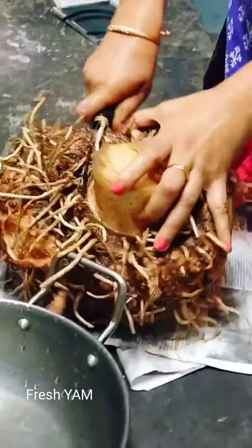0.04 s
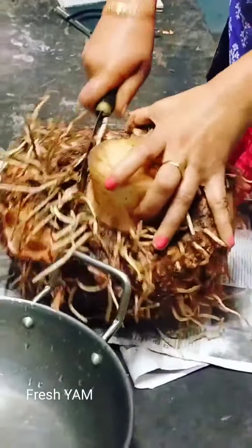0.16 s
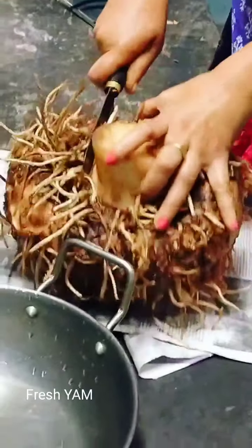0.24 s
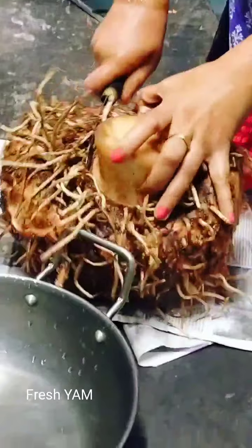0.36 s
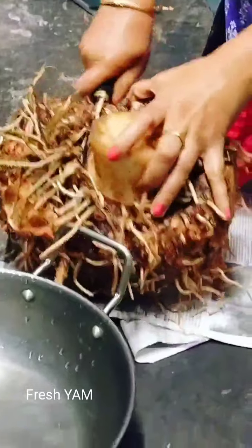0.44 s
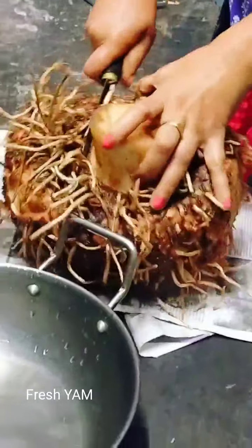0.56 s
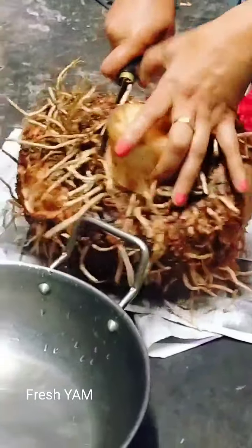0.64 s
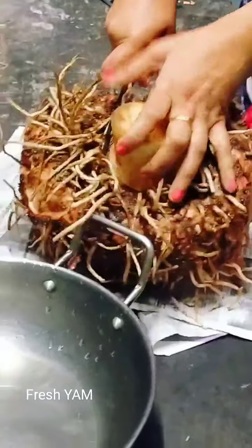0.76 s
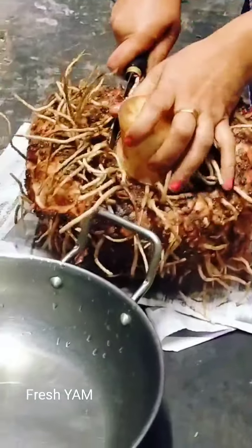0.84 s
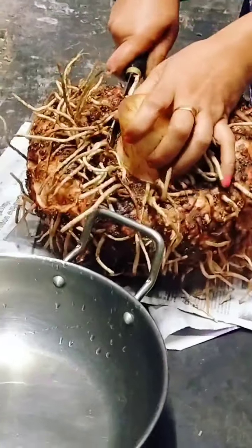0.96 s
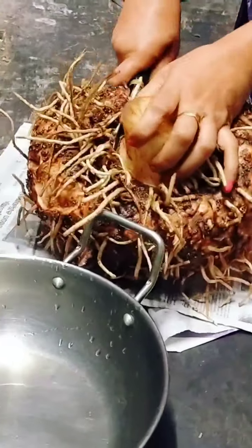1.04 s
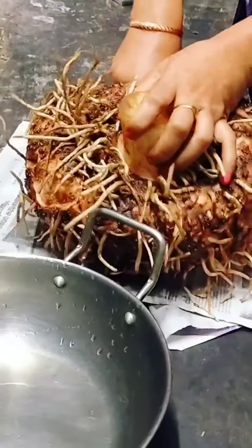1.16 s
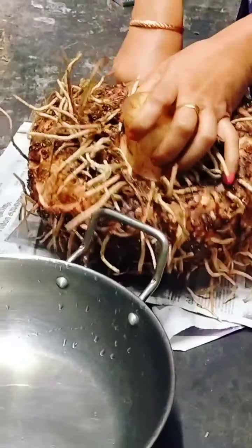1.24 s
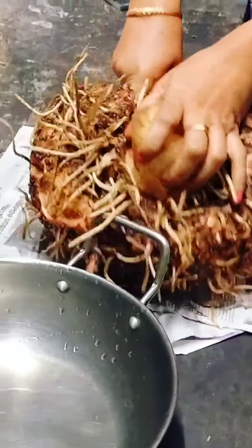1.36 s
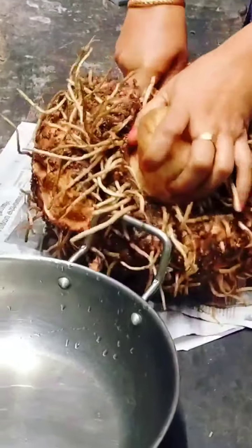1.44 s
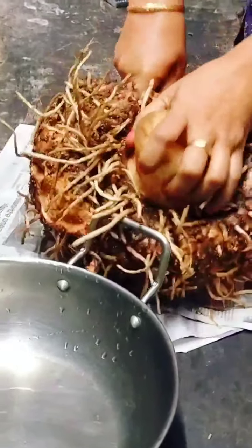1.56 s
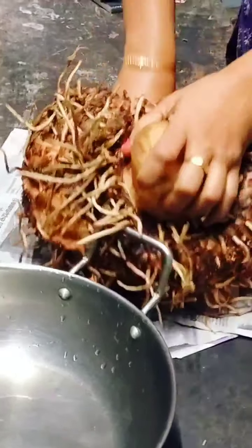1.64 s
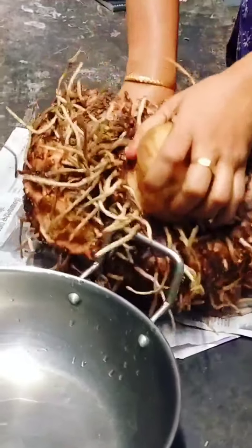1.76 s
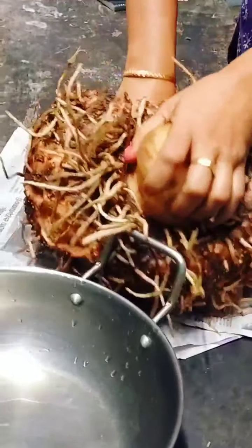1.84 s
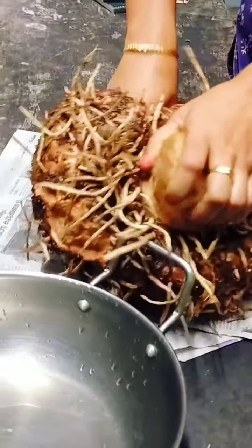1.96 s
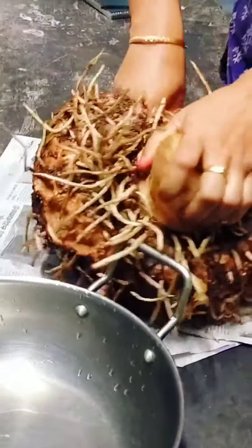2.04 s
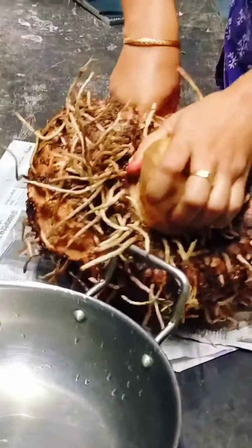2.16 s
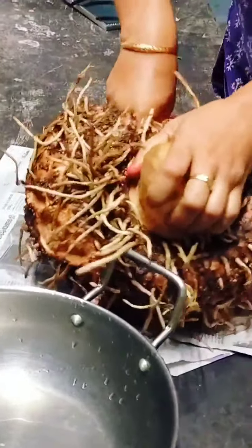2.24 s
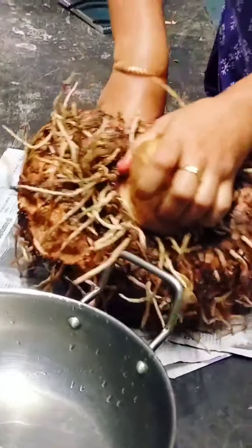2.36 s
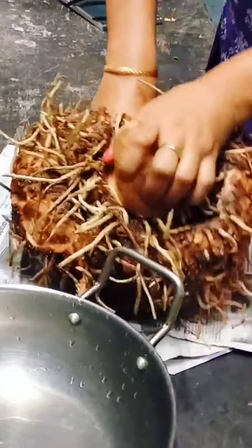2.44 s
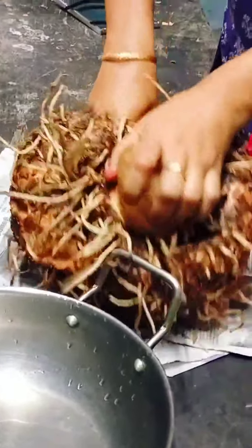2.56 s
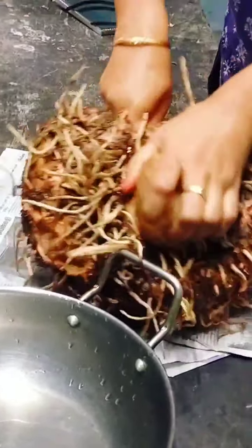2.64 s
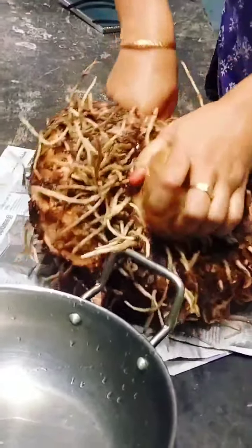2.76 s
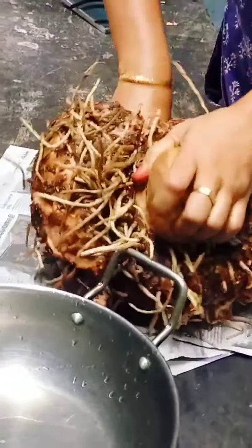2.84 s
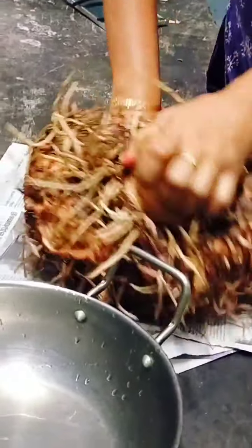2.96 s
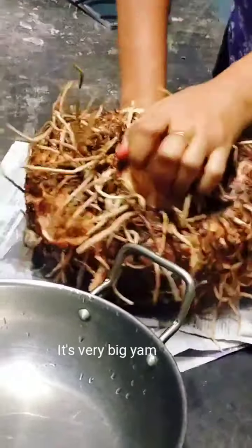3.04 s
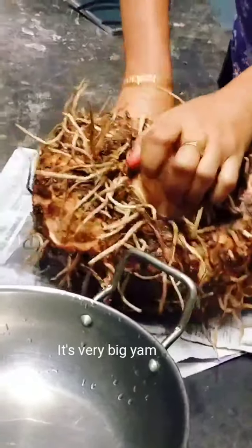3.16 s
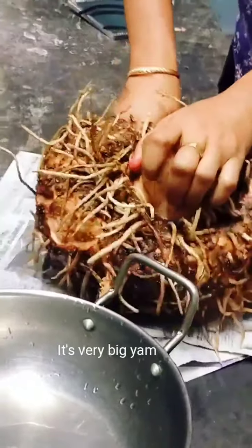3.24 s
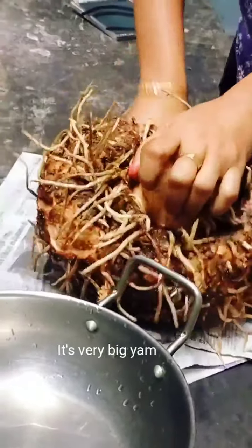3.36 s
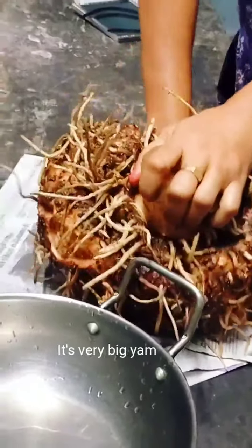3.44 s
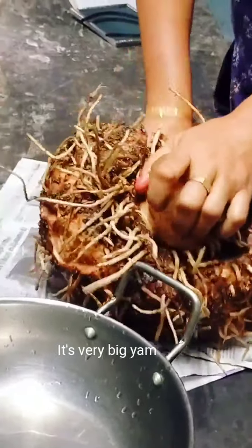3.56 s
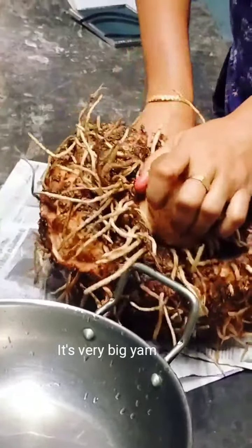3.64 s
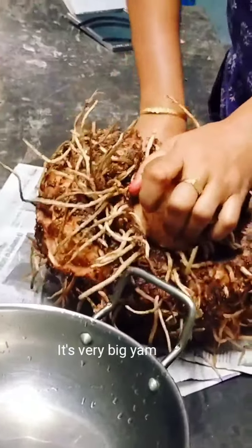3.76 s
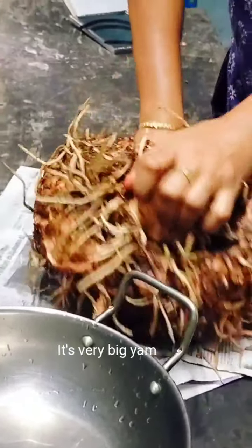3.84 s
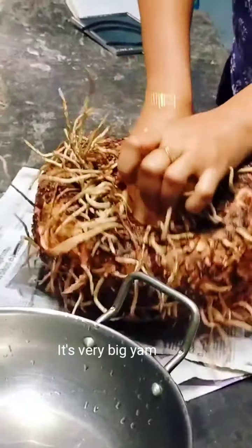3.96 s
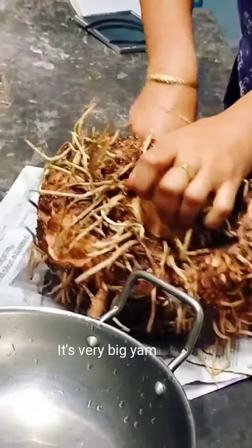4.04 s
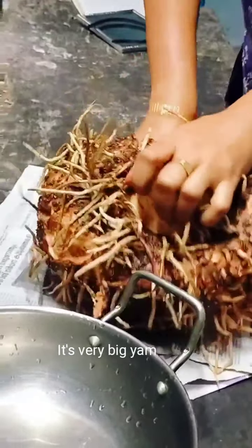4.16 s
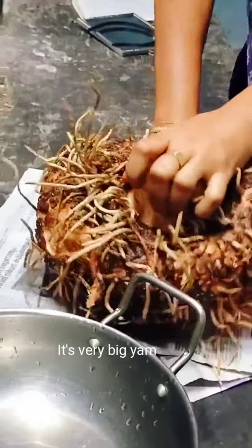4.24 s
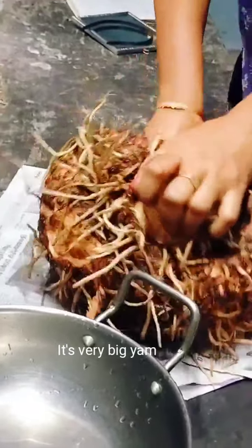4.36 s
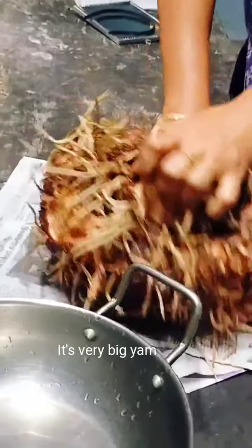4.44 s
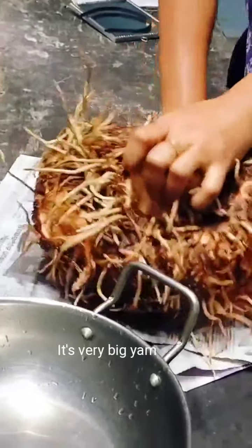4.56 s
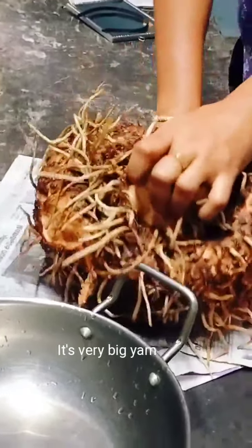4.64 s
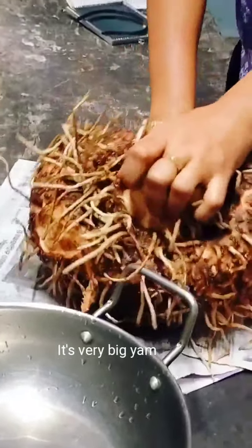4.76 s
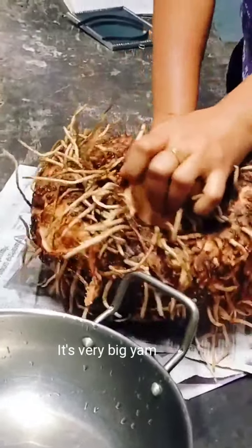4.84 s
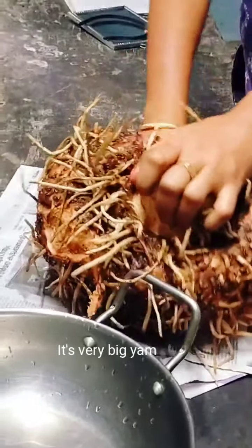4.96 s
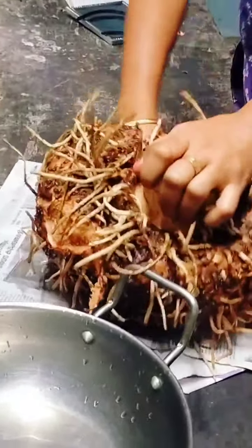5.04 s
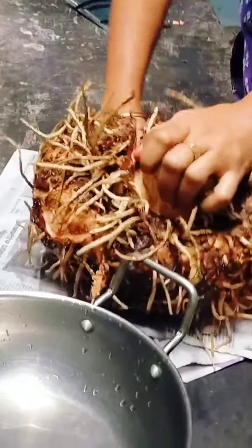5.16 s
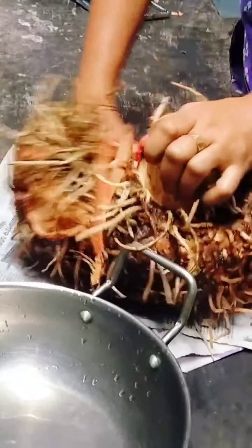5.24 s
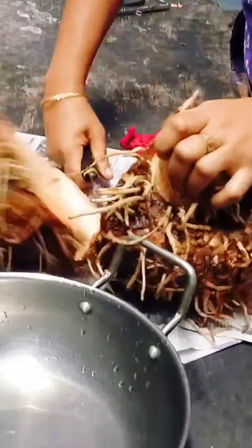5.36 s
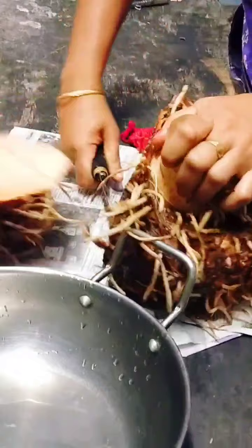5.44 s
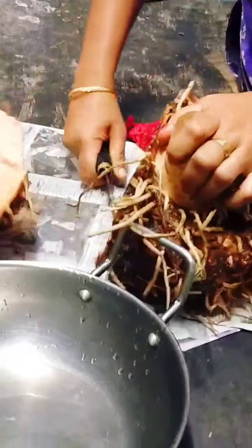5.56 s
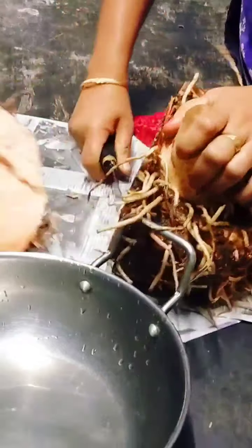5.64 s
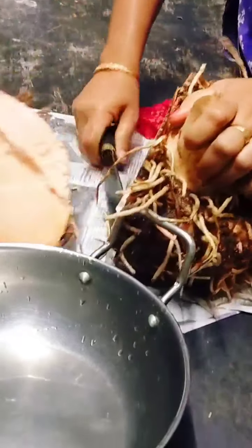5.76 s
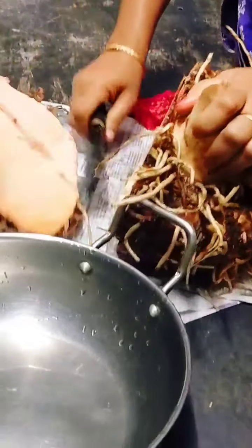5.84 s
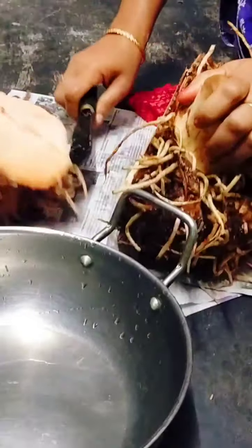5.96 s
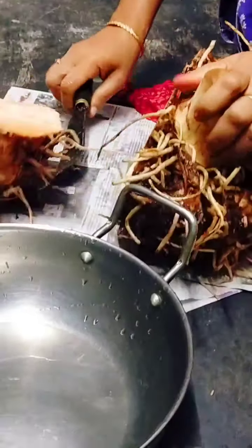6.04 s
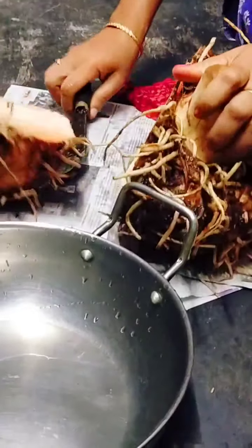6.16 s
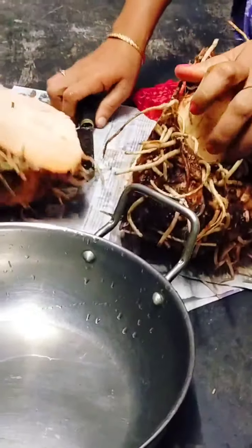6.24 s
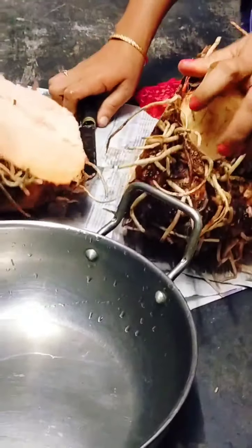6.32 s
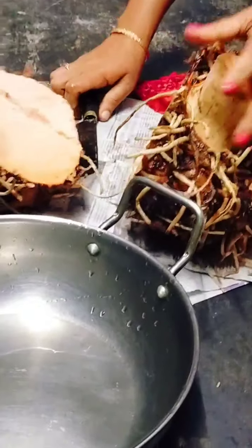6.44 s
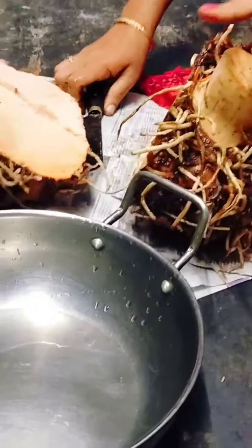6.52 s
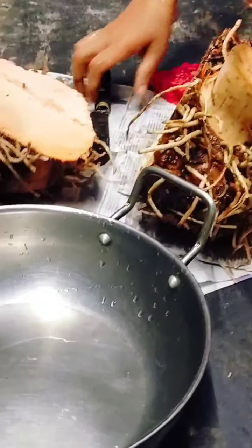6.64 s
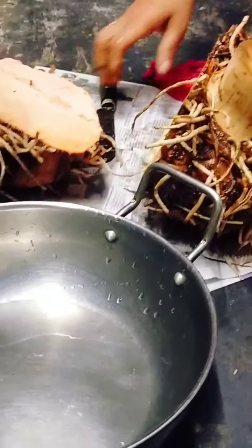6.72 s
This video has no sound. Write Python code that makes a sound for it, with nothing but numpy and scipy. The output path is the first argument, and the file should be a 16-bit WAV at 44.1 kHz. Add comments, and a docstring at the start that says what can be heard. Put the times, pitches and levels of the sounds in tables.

```python
"""Short knife strokes tear through a huge rooty yam: fibres rip and snap, and juice fizzes in the cut.
Clumped clicks and noise bursts ring broad resonances of yam and blade; the fizz is treble hiss, combed.
Knocks and thuds ring the modes of the table, which rumbles on; the yam splits, one half falls and rocks,
and the knife is laid down. A far bird (gliding sines), outdoor air and puffs of wind (noise) lie below."""
import sys
import numpy as np
from scipy import signal
from scipy.fft import rfft, irfft, next_fast_len
from scipy.io import wavfile

SR = 44100
rng = np.random.default_rng(int(sys.argv[2]) if len(sys.argv) > 2 else 0)


def dump(signal):
    """Clip the signal to [-1, 1] and save it as 16-bit WAV at the path in sys.argv[1]."""
    limited = np.clip(np.atleast_2d(signal).T, -1, 1)
    pcm = np.round(limited * 32767).astype(np.int16)
    wavfile.write(sys.argv[1], SR, pcm)


N = 299292  # length in samples

# Single fibres snapping. Each row: start in seconds, relative crunch level in dB,
# relative treble level in dB, brightest near this pitch in Hz.
SNAPS = [(0.2532, -42, -26, 10300), (0.4928, -33, -34, 6270), (1.1535, -36, -33, 7800),
         (1.1912, -34, -19, 9150), (1.6337, -41, -35, 7300), (1.6627, -29, -27, 5500),
         (1.6759, -25, -28, 9200), (1.684, -34, -31, 6500), (1.7068, -33, -33, 6000),
         (1.7767, -49, -40, 6000), (2.0724, -42, -28.5, 10700), (2.3614, -27, -29, 8100),
         (2.8843, -27, -34, 7900), (2.9, -37, -27.5, 4800), (3.0142, -35, -37, 6200),
         (3.207, -36, -32.5, 8950), (3.2288, -26, -32, 6400), (3.4658, -34, -28.5, 6300),
         (3.7303, -30, -35, 8800), (3.7654, -31, -32, 6900), (3.782, -36, -29, 7500),
         (3.9251, -26, -21.5, 6850), (3.9371, -24, -38, 6600), (3.9704, -16.5, -26, 5460),
         (4.2128, -22.5, -34.5, 8000), (4.243, -35, -40, 6400), (4.257, -28, -33, 6100),
         (4.541, -30, -38, 4800), (4.5761, -38, -31, 6100), (4.6002, -25, -26, 4650),
         (4.606, -14, -25, 4500), (4.6149, -21, -29, 4740), (5.1203, -25, -32, 7000),
         (5.2011, -20, -24, 5750), (5.2274, -18.5, -16.5, 5600), (5.247, -21, -21, 4800),
         (5.2675, -15.5, -10.5, 4560), (5.2786, -7, -28, 5200), (5.2933, -16, -27, 8600),
         (5.3093, -19, -25, 6000), (5.321, -18, -19, 8100), (5.3403, -17, -34, 8700),
         (5.4024, -16.5, -30, 8300), (5.476, -16.5, -26.5, 5400), (6.002, -45, -38, 6300),
         (6.011, -42.5, -38, 6040), (6.3436, -20, -27, 6900), (6.5571, -27, -38, 4800)]
# The weight of the yam jolting the table. Each row: start in seconds, relative level in dB,
# loudest mode near this pitch in Hz.
THUDS = [(0.028, -45.5, 120), (1.197, -39, 95), (1.681, -34.5, 119), (1.781, -32.5, 130), (1.81, -46, 149),
         (1.951, -40, 130), (2.351, -33.5, 95), (3.0, -37.5, 90), (3.26, -35.5, 120), (3.949, -36.5, 100),
         (4.619, -24, 124), (4.89, -34, 90), (5.29, -25, 130), (5.402, -17.5, 105), (5.473, -10.5, 99),
         (5.499, -23, 200), (5.529, -29, 140), (5.595, -30, 106), (5.652, -37, 130), (5.81, -38.5, 110.3),
         (6.154, -37.5, 140), (6.313, -35, 200), (6.342, -30, 200), (6.56, -35, 200)]


def from_db(db):
    """Decibels to an amplitude factor."""
    return 10 ** (np.asarray(db) / 20)


def rms_one(x):
    """Scale a signal to an RMS of 1."""
    return x / np.sqrt(np.mean(x ** 2) + 1e-20)


def in_time(rows):
    """Draw each column of a table as a line through time; the first column holds the seconds."""
    seconds, *columns = np.transpose(rows)
    return [np.interp(np.arange(N) / SR, seconds, column) for column in columns]


def band(x, low_hz, high_hz):
    """Gentle band-pass filter."""
    return signal.sosfilt(signal.butter(2, [low_hz, high_hz], "band", fs=SR, output="sos"), x)


def drift(rate_hz):
    """Slow random wander of spread 1: noise through two equal low-pass poles, one point per 40 samples."""
    step, settle = 40, 2000
    r = np.exp(-2 * np.pi * rate_hz * step / SR)
    noise = rng.standard_normal(N // step + settle + 2)
    slow = signal.lfilter([1], [1, -2 * r, r * r], noise)[settle:]
    return np.interp(np.arange(N) / step, np.arange(len(slow)), rms_one(slow))


def resonance(x, hz, width_hz):
    """One resonant peak; a wider peak dies away sooner."""
    r = np.exp(-np.pi * width_hz / SR)
    feedback = [1, -2 * r * np.cos(2 * np.pi * hz / SR), r * r]
    return signal.lfilter([1, 0, -1], feedback, x) * (1 - r * r) / 2


def resonances(x, snap_db, peaks):
    """Yam and blade: broad parallel peaks, shifting in strength as the blade moves, driven by x and snaps.

    snap_db(hz) gives the level of every snap at a peak."""
    snap_ms, length = 1.97, 800  # fraying time constant; samples
    age_ms = np.arange(length) * 1000 / SR
    crackle = rng.standard_normal((len(SNAPS), length))
    crackle[:, 0] = 5.1  # the fibre parts at once, then frays
    out = 0
    for k, (hz, width_hz, db) in enumerate(peaks):
        force = x * from_db(1.5 * drift(15))
        for row, noise, level_db in zip(SNAPS, crackle, snap_db(hz)):
            at = round(row[0] * SR)
            force[at:at + length] += from_db(level_db) * noise * np.exp(-age_ms / snap_ms)
        polarity = (-1) ** k
        out = out + polarity * from_db(db) * resonance(force, hz, width_hz)
    return out


def grains(per_s, spread_db):
    """Random clicks in clumps, a few much larger than the rest."""
    sizes = from_db(spread_db * np.minimum(rng.exponential(1, N), 4)) * rng.choice([-1, 1], N)
    happens = rng.random(N) < per_s / SR
    return rms_one(sizes * happens * from_db(2.5 * drift(80)))


def knife():
    """Tearing under the strokes and single snaps shake the same yam and blade, which ring on briefly."""
    # Tearing swells to a peak and dies away. Each row: peak time in seconds, relative tearing level in dB,
    # rise in seconds per 20 dB, fall in seconds per 20 dB, crunch above tearing in dB.
    # Rises below 3 ms and falls below 10 ms, negative ones too, are held at those limits.
    stroke_rows = [(0.256, -53, 0.2, 0.16, -8), (0.5, -56.5, 0.2, 0, 6), (1.183, -37.5, 0.04, 0.0644, -2),
                   (1.24, -63, -1.5, 0, -9), (1.67, -43, 0.07, 0.2, -2.5), (1.702, -38.5, 0.03, 0.09, 0.5),
                   (1.772, -54.5, 0.16, 0.1, -5), (2.354, -40, 0.05, 0.015, 1), (2.893, -41, -0.01, .06, 3),
                   (3.016, -52, 0.17, 0.18, 0), (3.21, -45, 0.08, 0.08, 0.5), (3.47, -46.5, .03, 0.08, 2.5),
                   (3.73, -56, 0.16, .1, -13), (3.782, -48, 0.03, 0.2, 1.5), (3.922, -41, -0.26, 0.14, 3),
                   (4.214, -51, -0.16, .05, 4), (4.258, -46, .02, 0.06, 2), (4.605, -49, 0.06, 0.16, 8),
                   (5.121, -45.5, 0.04, -0.14, -3), (5.202, -49, 0.03, -0.05, 4),
                   (5.229, -45, 0.1, 0.11, 6.5), (5.248, -45, -0.4, .04, 6),
                   (5.268, -35.5, -0.2, 0.0459, 5.5), (5.283, -33.5, 0, 0.0634, 2.5),
                   (5.323, -33, 0.06, .12, 2.5), (5.402, -49, 0.03, 0.2, 11), (5.478, -53, -0.4, 0.3, 3),
                   (6.345, -55, 0.1, 0.24, 4)]
    # Low peaks of rind and flesh. Each row: pitch in Hz, width in Hz, relative level in dB.
    crunch_peaks = [(600, 1540, -11.5), (1300, 286, -3.5), (2010, 252, 1), (2590, 500, 0.5),
                    (3210, 760, -17)]
    # Treble peaks of the tearing. Each row: pitch in Hz, width in Hz, relative level in dB.
    tear_peaks = [(4470, 930, 1), (6270, 480, 1.5), (8350, 2100, -0.5), (10800, 1400, 0.5),
                  (13300, 3800, -3.5), (15600, 940, -3)]

    tear, crunch, t = np.zeros(N), np.zeros(N), np.arange(N) / SR
    for s, db, rise_s, fall_s, share_db in stroke_rows:
        near = slice(max(round((s - .4) * SR), 0), round((s + .8) * SR))
        since = t[near] - s
        steps_down = np.where(since < 0, -since / max(rise_s, .003), since / max(fall_s, .01))
        level = from_db(db - 20 * steps_down)
        tear[near] += level
        crunch[near] += level * from_db(share_db)
    fibres = grains(4000, spread_db=3.0) + 0.15 * rng.standard_normal(N)
    _, crunch_db, treble_db, bright_hz = np.transpose(SNAPS)

    def treble_snap_db(hz):
        """A snap weakens by 14.4 dB per octave away from its brightest pitch."""
        return treble_db - 3.5 - 14.4 * abs(np.log2(hz / bright_hz))

    bright = resonances(tear * fibres, treble_snap_db, tear_peaks)
    low = resonances(crunch * fibres, lambda hz: crunch_db - 4.5, crunch_peaks)
    return from_db(4.5) * bright + from_db(11.5) * low


def fizz():
    """Fine hiss from the wet cut, patchy across the treble; a bounce off the hand combs it into stripes."""
    # Loudness of the hiss before a fixed trim. Each row: time in seconds, level in dB.
    fizz_levels = [(0.0, -55.5), (0.72, -59), (1.09, -51), (1.17, -47), (1.28, -64), (1.59, -66),
                   (1.85, -56), (2.15, -53), (2.4, -54), (3.1, -56), (3.29, -66), (3.76, -69), (5.05, -68),
                   (5.2, -66), (5.35, -52), (5.56, -68), (5.84, -77), (6.79, -67)]
    # Extra path of the bounce. Each row: time in seconds, delay in ms.
    bounce_path = [(0, 1.2), (1.15, 1.33), (1.85, 1.1), (3.3, 1.05), (6.79, 1.05)]
    full_db, range_db, most = -54, 10, .55  # the bounce is clearest while the fizz is loud

    level_db, = in_time(fizz_levels)
    path_ms, = in_time(bounce_path)
    strength = most * np.clip(1 + (level_db - full_db) / range_db, .2, 1)
    white = rng.standard_normal((2, N))
    edges_hz = [7500, 9000, 10500, 12000, 13500, 15000, 17000]
    hiss = 0
    for k, (low, high) in enumerate(zip(edges_hz, edges_hz[1:])):
        patch = from_db(1.6 * k + 2.2 * drift(3.4))
        hiss = hiss + patch * band(white[k % 2], low, high)
    late = np.interp(np.arange(N) - path_ms * SR / 1000, np.arange(N), hiss)
    combed = (hiss + strength * late) / np.sqrt(1 + strength ** 2)
    return from_db(level_db - 2.5) * rms_one(combed)


def strike(pushes, modes, spread_db):
    """Each push (start sample, force shape, favoured Hz) rings every mode with a strength of its own."""
    out, chance = np.zeros(N), rng.normal(0, 1, (len(pushes), len(modes)))
    for k, (hz, db, t60) in enumerate(modes):
        force = np.full(N + 2000, 1e-18)  # tiny offset, far below hearing
        for (at, shape, spot_hz), luck in zip(pushes, chance[:, k]):
            off_db = -4.0 * abs(np.log2(hz / spot_hz))  # the spot that is hit favours some modes
            force[at:at + len(shape)] += shape * from_db(db + off_db + spread_db * luck)
        r, w = from_db(-60 / (t60 * SR)), 2 * np.pi * hz / SR
        out += signal.lfilter([0, np.sin(w)], [1, -2 * r * np.cos(w), r * r], force[:N])
    return out


def knocks():
    """Hard things meet the table top; a harder contact is a shorter push and reaches the higher modes."""
    # Handle, blade or rind. Each row: start in seconds, relative level in dB,
    # contact time constant in ms, loudest mode near this pitch in Hz.
    knock_rows = [(1.683, -29.5, 0.32, 420), (1.955, -23.5, 0.31, 380), (3.262, -29.5, 0.24, 400),
                  (4.519, -30.5, 0.037, 850), (4.6184, -8, 0.16, 600), (5.306, -15.5, 0.074, 690),
                  (5.409, -21, 0.13, 925), (5.476, -16.5, 0.063, 1140), (6.1555, -25.5, 0.14, 500),
                  (6.313, -21.5, 0.26, 386), (6.3434, -20, 0.051, 1330), (6.557, -29.5, 0.035, 1370)]
    # Modes of the table top. Each row: pitch in Hz, relative level in dB, 60 dB decay in seconds.
    top_modes = [(288, -38, 0.01), (405, -1.5, 0.046), (479, -10.5, 0.095), (542, -11, 0.077),
                 (649, -5, 0.051), (832, 5, 0.021), (1070, -3, 0.019), (1337, 2.5, 0.023),
                 (1950, 1.5, 0.03), (2560, -11, 0.012), (2640, -3, 0.027)]
    touches = [(0, 3.5), (.0045, -7.5), (.011, -8)]  # three quick touches: delay in s, level in dB

    pushes, age_ms = [], np.arange(300) * 1000 / SR
    for s, db, contact_ms, spot_hz in knock_rows:
        shape = age_ms * np.exp(-age_ms / np.clip(contact_ms, .02, 1))
        for lag, touch_db in touches:
            push = shape / shape.sum() * from_db(db - 9.5 + touch_db)
            pushes.append((round((s + lag) * SR), push, spot_hz))
    return -band(strike(pushes, top_modes, spread_db=3), 280, 8200)


def thuds():
    """A soft heavy body presses for 2 ms and rings the frame; the air carries little of the slow push."""
    # Modes of the table frame, the two lowest ringing longest.
    # Each row: pitch in Hz, relative level in dB, 60 dB decay in seconds.
    frame_modes = [(66.5, -17.5, 2.2), (86.9, -16, 1.04), (101.7, -1.5, 0.087), (128.5, -7.5, 0.17),
                   (224.4, -8.5, 0.19), (268.6, -12, 0.19)]
    shape = np.hanning(round(0.002 * SR))
    pushes = []
    for s, db, spot_hz in THUDS:
        pushes.append((round(s * SR), shape / shape.sum() * from_db(db - 2.0), spot_hz))
    rung = strike(pushes, frame_modes, spread_db=4.0)
    return band(band(rung, 60, 1900), 47, 1800)


def rumble():
    """The table shakes faintly all along and shudders on after every thud: low noise, lifted and decaying."""
    rest_db, shake_db, shake_t60_s = -63, -17, 0.62  # shake_db is relative to the thud's table level
    jolts = np.zeros(N)
    for s, db, _ in THUDS:
        jolts[round(s * SR)] = from_db(db + shake_db)
    decay = from_db(-60 / (shake_t60_s * SR))
    level = from_db(rest_db) + signal.lfilter([1], [1, -decay], jolts + 1e-18)
    noise = band(band(rng.standard_normal(N), 58.6, 145), 58.6, 145)
    return level * from_db(0.99 * drift(5.6)) * rms_one(band(noise, 48, 290))


def yard(x):
    """Outdoor walls: eight feedback delays, duller on every round."""
    t60_s, wall_cut_hz = .34, 7000  # decay of the lows; treble loss per round
    lags_s = [.0113, .0149, .0181, .0223, .0269, .0311, .0367, .0419]
    size = next_fast_len(N + SR)
    hz = np.arange(size // 2 + 1) * SR / size
    loops = 0
    for k, lag in enumerate(lags_s):
        delay = np.exp(-2j * np.pi * hz * lag)
        back = from_db(-60 * lag / t60_s) * delay / (1 + 1j * hz / wall_cut_hz)
        loops = loops + (-1) ** k * back / (1 - back)
    return irfft(rfft(x, size) * loops, size)[:N]


def bird():
    """Two faint, hoarse whistles: gliding sines whose pitch trembles and loudness wavers."""
    # Each row: start in seconds, length in seconds, first pitch in Hz, last pitch in Hz, mean level in dB.
    whistles = [(1.55, .1, 1735, 1722, -50), (1.87, .22, 1030, 840, -49)]
    edge_s = 0.024  # fade in and out
    out, t = np.zeros(N), np.arange(N) / SR
    for s, length, first_hz, last_hz, db in whistles:
        glide_hz = np.interp(t, [s, s + length], [first_hz, last_hz])
        shape = np.clip(np.minimum(t - s, s + length - t) / edge_s, 0, 1)
        loudness = shape * from_db(db + 2.5 * drift(30))
        out += loudness * np.sin(2 * np.pi * np.cumsum(glide_hz + 35 * drift(60)) / SR)
    return out


def wind():
    """Puffs of wind on the microphone: very low lumpy noise that swells briefly."""
    # Each row: time in seconds, level at the peak of the puff in dB, added to the calm level.
    gust_rows = [(1.19, -54), (2.36, -62), (2.6, -64), (3.0, -57), (3.4, -48), (3.85, -60), (5.42, -46),
                 (5.86, -64), (6.07, -53), (6.28, -46.5), (6.55, -44)]
    calm_db, gust_s = -63.5, .07  # gust_s: half length of a puff
    level, t = from_db(calm_db), np.arange(N) / SR
    for s, db in gust_rows:
        level = level + from_db(db) * np.exp(-((t - s) / gust_s) ** 2)
    return level * rms_one(band(rng.standard_normal(N), 10.6, 31))


def air():
    """Distant outdoor wash: noise in third-octave bands that flicker a little, together and apart."""
    # Colour of the wash. Each row: pitch in Hz, relative level in dB per Hz.
    air_colour = [(59, -33), (100, -7.5), (140, 2), (238, -0.5), (300, -4), (467, -6.5), (825, -4),
                  (1040, -6), (1370, -5), (2180, -5), (4100, -22.5), (6810, -25.5), (8410, -25.5),
                  (11800, -35.5), (15500, -34)]
    air_db = -47  # level of the whole wash
    edges_hz, white = 90 * 2 ** np.arange(0, 7.7, 1 / 3), rng.standard_normal((2, N))
    hz, db = np.transpose(air_colour)
    together, out = drift(7.5), 0
    for k, (low, high) in enumerate(zip(edges_hz, edges_hz[1:])):
        level_db = np.interp(np.log(low * high) / 2, np.log(hz), db)
        flicker_db = 0.8 * together + 1.3 * drift(10.5)
        out = out + from_db(level_db + flicker_db) * band(white[k % 2], low, high)
    return from_db(air_db) * rms_one(out)


def scene():
    """Cut and knocks with their echoes from the yard, then the table, fizz and background."""
    cut, hits = knife(), knocks()
    echoes = yard(from_db(-15) * cut + from_db(-14.5) * hits)
    at_table = cut + hits + echoes + thuds() + fizz() + rumble()
    return (at_table + bird() + air() + wind())[None]


def record(dry):
    """A steep low-pass leaves the top at least 50 dB down from 15680 Hz up."""
    return signal.sosfilt(signal.cheby2(22, 50, 15680, fs=SR, output="sos"), dry)


dry = scene()
out = record(dry)
dump(out)
```